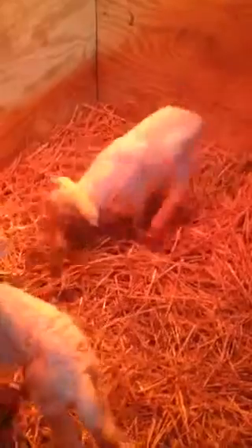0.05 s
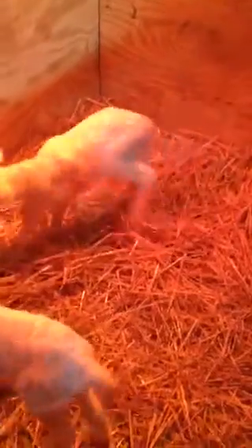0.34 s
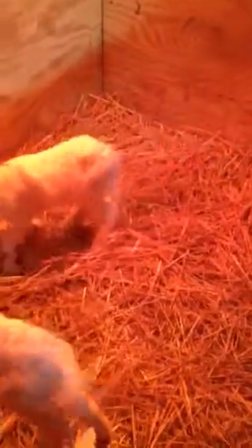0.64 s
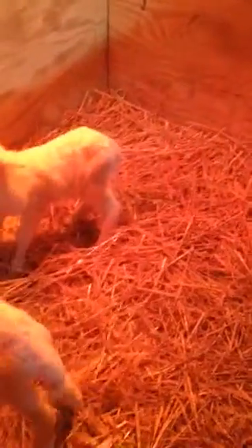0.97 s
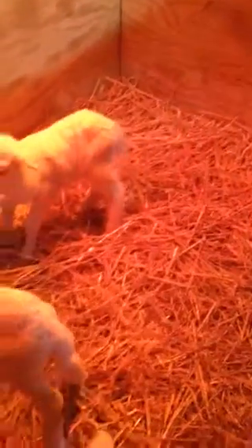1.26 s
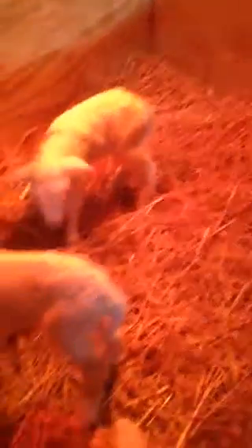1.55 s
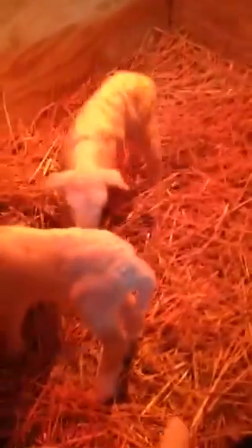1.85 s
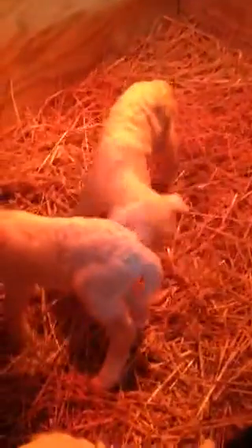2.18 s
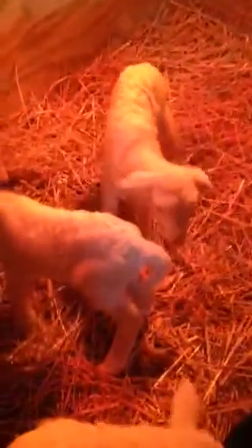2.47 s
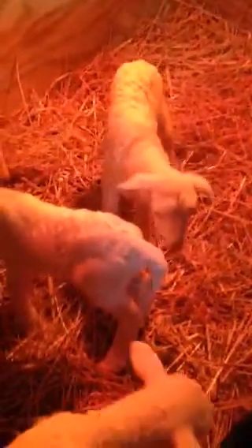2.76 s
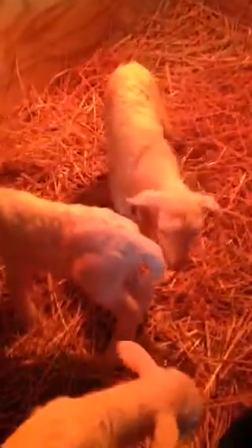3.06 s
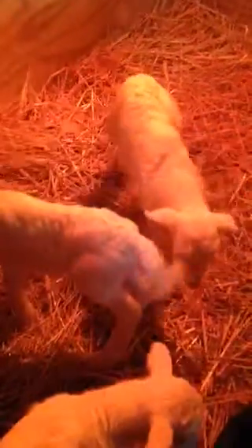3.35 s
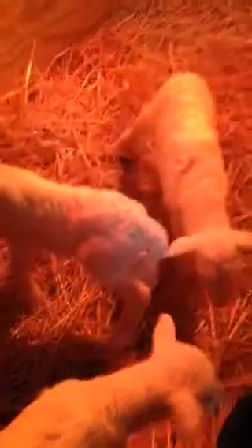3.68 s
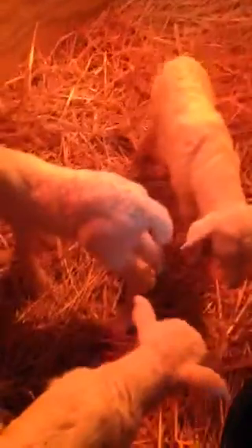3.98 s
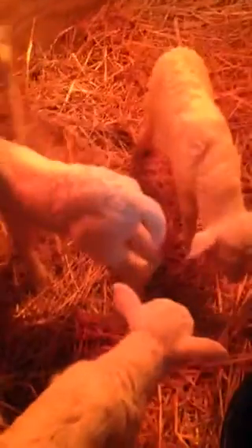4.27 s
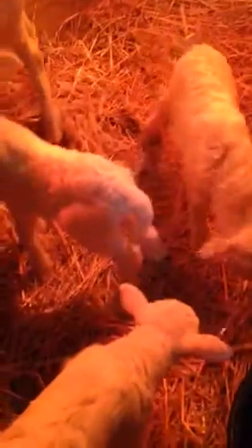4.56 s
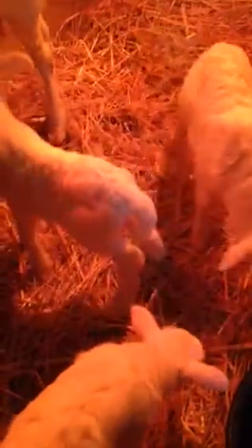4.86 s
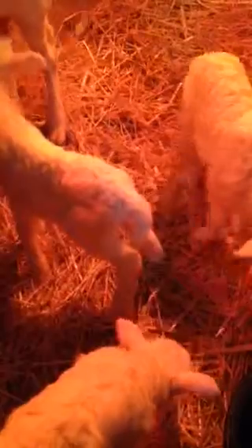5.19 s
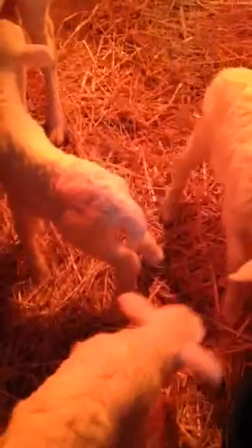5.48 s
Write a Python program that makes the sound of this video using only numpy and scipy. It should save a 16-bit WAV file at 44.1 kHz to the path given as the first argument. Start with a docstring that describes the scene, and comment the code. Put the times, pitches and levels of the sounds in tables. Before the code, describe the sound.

Newborn lambs shuffle about on dry straw in a small wooden pen. Their uneven steps make short, soft swells of fine rustling and crunching, dotted with crisp cracks and snaps of single stalks. Hooves now and then tick and thud faintly in the bedding. The movement eases briefly midway, then picks up again. A faint low barn hum lies underneath, and the small microphone sounds bright.

```python
"""Dry straw crackles as newborn lambs shuffle about in a small wooden pen.
Each step rubs and buckles many stalks: a fine rustle, a fuller crunch and rasp under weight,
single cracks and snaps. Hooves tick on thick stalks and thud softly into the bedding.
A faint hum wavers over the barn's low murmur; a small mono microphone rings near 6 kHz."""
import sys
import numpy as np
from scipy import signal
from scipy.fft import rfft, irfft, next_fast_len
from scipy.io import wavfile
from scipy.ndimage import uniform_filter1d

SR = 44100
rng = np.random.default_rng(int(sys.argv[2]) if len(sys.argv) > 2 else 0)


def wav_record(signal):
    """Record a signal, one row per channel, as 16-bit PCM in the file named by sys.argv[1]."""
    frames = np.transpose(np.atleast_2d(signal))
    bounded = np.clip(frames, -1, 1)
    # unit amplitude maps onto the largest positive 16-bit level
    quanta = np.round(bounded * 32767).astype(np.int16)
    wavfile.write(sys.argv[1], SR, quanta)


N = 252693

# hoof presses and lifts: t/s at full weight, rustle drive/dB, crunch/dB re drive, press time/s
HOOF_STEPS = [(0.003, -45.5, -12, 0.02), (0.132, -45, -16, 0.111), (0.267, -46, -16, 0.066),
              (0.401, -52.5, -13, 0.049), (0.516, -48.5, -17, 0.037), (0.617, -44.5, -17.5, 0.046),
              (0.759, -55.5, -11.5, 0.18), (0.891, -48, -17, 0.095), (1.079, -54, -15.5, 0.045),
              (1.491, -57, -20, 0.052), (1.586, -51.5, -15, 0.029), (1.751, -56.5, -15, 0.013),
              (1.815, -52.5, -24, 0.027), (1.878, -49.5, -14.5, 0.042), (2.022, -51, -14.5, 0.058),
              (2.122, -45.5, -17, 0.051), (2.391, -51.5, -14, 0.067), (2.466, -56.5, -18, 0.015),
              (2.668, -63.5, -9, 0.021), (2.838, -55.5, -13, 0.06), (3.214, -54.5, -14.5, 0.126),
              (3.516, -48.0, -15, 0.086), (3.619, -51, -10.5, 0.048), (3.845, -56.0, -10.5, 0.025),
              (3.946, -50.5, -15, 0.046), (4.016, -53, -16, 0.011), (4.085, -56, -7.5, 0.13),
              (4.322, -47, -13.5, 0.077), (4.407, -44.0, -15, 0.056), (4.693, -52.5, -10, 0.043),
              (5.238, -50, -10, 0.15), (5.506, -47, -15, 0.024), (5.578, -44, -16, 0.035),
              (5.725, -56.5, -15, 0.027)]
# bodies stir the bedding between steps: t/s, rustle drive/dB
BODY_STIR = [(0.0, -57.5), (1.0, -55), (1.21, -61), (1.305, -68), (1.42, -63), (1.66, -58.5), (2.22, -53.5),
             (2.52, -71), (2.8, -56.5), (3.02, -62), (3.42, -51.0), (3.77, -59.5), (4.15, -56), (4.8, -57),
             (5.05, -54.5), (5.73, -46.5)]
# fine rustle spectrum: f/Hz, relative level/dB
RUSTLE_SPECTRUM = [(1000, -29), (2500, -9), (4000, -4), (6300, -0.5), (9000, -0.5), (12000, -0.8),
                   (15500, -3.5)]
# spectrum of straw under weight: f/Hz, relative level/dB
CRUNCH_SPECTRUM = [(40, -30), (150, -7), (400, -2), (720, -3), (980, -0.5), (1350, -1.5), (2000, 0),
                   (3500, 1), (6000, 2.5), (12000, -25)]
# loudest bundles crushed: t/s, relative level/dB
BUNDLE_CRUSHES = [(0.1301, -28), (0.5921, -40), (0.6114, -44), (0.8304, -31.5), (0.8734, -33),
                  (0.9684, -35.5), (0.9844, -35.5), (1.7525, -35), (1.811, -44), (2.1178, -34),
                  (2.1264, -29), (2.993, -41.5), (3.0632, -39), (3.4297, -33), (3.8314, -45), (3.946, -38),
                  (4.0585, -39), (4.1045, -38.5), (4.2921, -36), (4.376, -33), (4.5952, -40)]
# hollow stalks buckle: t/s, dry peak/dB, f/Hz
STALK_CRACKS = [(0.0973, -45, 6500), (0.524, -50, 6360), (0.595, -42.5, 6000), (0.6125, -51, 6300),
                (0.755, -46, 6700), (0.969, -51, 6300), (1.207, -55, 6250), (1.265, -58, 6500),
                (1.3857, -62, 6400), (1.5644, -53, 6400), (1.6145, -48.5, 6350), (1.754, -58, 6300),
                (1.813, -48, 6200), (1.82, -49, 6000), (2.1286, -47, 6200), (2.8537, -53, 6400),
                (2.865, -52, 6300), (2.9703, -57, 6200), (3.0636, -53, 6400), (3.281, -58, 6460),
                (3.8243, -48, 6250), (3.832, -48, 5840), (3.946, -52, 6640), (4.1016, -50, 6700),
                (4.2512, -52, 6400), (4.597, -50.5, 6200), (4.6002, -54, 6170)]
# thin stalks break: t/s, dry peak/dB, high-pass f/Hz
STALK_SNAPS = [(1.2074, -45, 3000), (1.2252, -45.5, 6500), (1.3392, -50, 3000), (1.3578, -50, 9000),
               (2.1227, -34, 5950), (3.1164, -38.5, 9300), (4.1618, -36, 9000), (4.252, -39, 6000)]
# squeezed stalks, thick low and thin high: t/s, level/dB, f/Hz, swell sigma/s
STALK_RASPS = [(0.63, -69, 6200, 0.018), (2.145, -67, 1750, 0.016), (2.848, -72, 890, 0.039),
               (3.833, -65, 5950, 0.0097), (3.552, -67, 1600, 0.02), (4.31, -64, 1700, 0.022),
               (4.415, -63.5, 1800, 0.028), (4.696, -73.5, 1200, 0.021), (5.525, -64, 5740, 0.016),
               (5.59, -59.5, 5700, 0.024), (5.60, -63.5, 2010, 0.023)]
# leg dragged along stalks: t/s, level/dB
LEG_DRAG = [(0.76, -89), (0.84, -70), (0.98, -69), (1.03, -73), (1.11, -73), (1.2, -94)]
# hooves on thick stalks: t/s, dry peak/dB, f/Hz
HOOF_KNOCKS = [(0.368, -57, 1270), (3.177, -52, 1030), (4.101, -56, 1730), (4.1618, -45.5, 1510)]
# cushioned footfalls: t/s, level/dB, f/Hz, swell sigma/s
HOOF_THUDS = [(0.102, -63, 137, 0.041), (0.142, -68.5, 200, 0.04), (0.445, -69, 165, 0.061),
              (0.835, -72.5, 345, 0.044), (1.443, -68, 138, 0.018), (2.13, -69, 444, 0.016),
              (2.82, -71, 148, 0.058), (3.877, -71, 214, 0.065), (4.573, -71.5, 138, 0.056),
              (5.45, -70.5, 195, 0.031)]
# distant hum: t/s, f/Hz, level/dB
DISTANT_HUM = [(0.0, 135, -79), (0.85, 138.2, -79.5), (1.6, 141.4, -71), (2.9, 140.1, -72),
               (3.6, 139.8, -79.5), (4.4, 132.5, -78.5), (5.73, 134.6, -82.5)]
# barn murmur spectrum: f/Hz, relative level/dB
BARN_SPECTRUM = [(25, -30), (50, -20), (80, -15), (115, -6.5), (165, 1.5), (220, -1.5), (320, -8),
                 (600, -10), (1200, -15), (3000, -16.5), (15000, -22)]

PEN_T60_S = 0.24
MIC_HZ, MIC_WIDTH_HZ, MIC_BOOST_DB, CUTOFF_HZ = 6334, 1320, 12.5, 15400


def straw(drive_db, crunch_db):
    """Harder movement sets more stalks slipping, in clumps; weight adds a fuller crunch."""
    slips_per_s = 4500 * from_db(.7 * (drive_db - np.mean(drive_db)))
    clumps = from_db(1.06 * drift(rate_hz=38))
    light = scatter(slips(slips_per_s, spread_db=0.5) * clumps, wet_db=-2.5)
    heavy = scatter(slips(.6 * slips_per_s, spread_db=2.0) * clumps, wet_db=-4.0)
    rustle = from_db(drive_db - 5.0) * colour(light, RUSTLE_SPECTRUM)
    crunch = from_db(crunch_db) * colour(heavy, CRUNCH_SPECTRUM)
    return rustle + crunch


def steps(lift_per_press, squareness, stir_crunch_db):
    """Rustle drive and crunch in dB: each step swells, lets go and adds its power to the stirring."""
    t = np.arange(N) / SR
    stir_db, = curves(BODY_STIR)
    drive_power = from_db(stir_db) ** 2
    crunch_power = from_db(stir_db + stir_crunch_db) ** 2
    for at_s, db, crunch_db, press_s in HOOF_STEPS:
        span_s = np.where(t < at_s, press_s, press_s * lift_per_press)
        spans_away = np.minimum(np.abs((t - at_s) / span_s), 10)
        load = from_db(db) * np.exp(-spans_away ** squareness)  # 2 is a bell; more holds longer
        drive_power += load ** 2
        crunch_power += (load * from_db(crunch_db)) ** 2
    return 10 * np.log10(drive_power), 10 * np.log10(crunch_power)


def slips(per_s, spread_db):
    """Stalks catch and let go at random: many tiny clicks, a few large, at even mean power."""
    sizes = from_db(spread_db * np.minimum(rng.exponential(1, N), 4.5))
    signs = rng.choice([-1, 1], N)
    clicks = sizes * signs * (rng.random(N) < per_s / SR)
    local_power = np.abs(uniform_filter1d(clicks ** 2, size=1100))
    return clicks / np.sqrt(local_power + 1e-6)


def crushes(drive_db, small_per_s, grain_db, decay_s):
    """A bundle gives way, then splinters briefly; small ones go at random, scaled by the movement."""
    t, out = np.arange(SR // 10) / SR, np.zeros(N + SR)
    starts = np.flatnonzero(rng.random(N) < small_per_s / SR)
    small_db = drive_db + 2 + 5 * rng.standard_normal(N)
    small_crushes = [(i / SR, small_db[i]) for i in starts]
    for at_s, db in list(BUNDLE_CRUSHES) + small_crushes:
        noise = rng.standard_normal(len(t))
        splinters = unit_rms(noise * from_db(grain_db * rng.standard_normal(len(t))))
        out[round(at_s * SR):][:len(t)] += from_db(db - 11.5) * splinters * np.exp(-t / decay_s)
    band = signal.butter(1, [4000, 10000], "band", fs=SR, output="sos")
    return pen(signal.sosfilt(band, out[:N]), wet_db=-5.0)


def cracks(ring_s):
    """A hollow stalk buckles and rings for a few cycles."""
    t, out = np.arange(SR // 100) / SR, np.zeros(N + SR)
    envelope = t / ring_s * np.exp(1 - t / ring_s)
    for at_s, db, hz in STALK_CRACKS:
        out[round(at_s * SR):][:len(t)] += from_db(db) * envelope * np.sin(2 * np.pi * hz * t)
    return pen(out[:N], wet_db=-6)


def snaps(decay_s):
    """A thin stalk breaks with one bright click."""
    t, out = np.arange(SR // 100) / SR, np.zeros(N + SR)
    for at_s, db, low_hz in STALK_SNAPS:
        splinter = rng.standard_normal(len(t)) * np.exp(-t / decay_s)
        click = signal.sosfilt(signal.butter(2, low_hz, "high", fs=SR, output="sos"), splinter)
        out[round(at_s * SR):][:len(t)] += from_db(db) * click / np.abs(click).max()
    return pen(out[:N], wet_db=-14)


def rasps(width_hz):
    """Stalks grind together under weight, each bundle at its own pitch."""
    t, out = np.arange(N) / SR, np.zeros(N)
    grinding = scatter(slips(per_s=2500, spread_db=0.0), wet_db=-11)
    for at_s, db, hz, sigma_s in STALK_RASPS:
        swell = np.exp(-.5 * ((t - at_s) / sigma_s) ** 2)
        out += from_db(db) * swell * unit_rms(resonate_twice(grinding, hz, width_hz))
    return out


def drag(hz, width_hz):
    """Stalks sliding along a leg catch in quick succession and rasp in one band."""
    level_db, = curves(LEG_DRAG)
    catches = scatter(slips(per_s=5300, spread_db=2.0), wet_db=2.0)
    return from_db(level_db) * unit_rms(resonate_twice(catches, hz, width_hz))


def knocks(width_hz, decay_s):
    """A hoof meets a thick stalk: a short, dull tick."""
    t, out = np.arange(SR // 20) / SR, np.zeros(N + SR)
    for at_s, db, hz in HOOF_KNOCKS:
        impact = rng.standard_normal(len(t)) * np.exp(-t / decay_s)
        tick = resonate(impact, hz, width_hz)
        out[round(at_s * SR):][:len(t)] += from_db(db) * tick / np.abs(tick).max()
    return pen(out[:N], wet_db=-13)


def thuds(relative_width):
    """The bedding cushions each footfall into a low, rounded swell."""
    t, out = np.arange(N) / SR, np.zeros(N)
    for at_s, db, hz, sigma_s in HOOF_THUDS:
        swell = np.exp(-.5 * ((t - at_s) / sigma_s) ** 2)
        boom = swell * resonate_twice(rng.standard_normal(N), hz, relative_width * hz)
        out += from_db(db) * boom * np.linalg.norm(swell) / np.linalg.norm(boom)
    return out


def scatter(clicks, wet_db, spots=8):
    """Clicks come from all over the bedding, each spot with its own reflections."""
    spot = rng.integers(0, spots, N)
    return sum(pen(clicks * (spot == k), wet_db) for k in range(spots))


def pen(x, wet_db):
    """Direct sound plus dense, fast-dying reflections off the boards; power is kept."""
    t = np.arange(int(PEN_T60_S * SR)) / SR
    tail = rng.standard_normal(len(t)) * from_db(-60 * t / PEN_T60_S) * (t > .003)
    reflections = signal.fftconvolve(x, tail / np.linalg.norm(tail))[:N]
    wet = from_db(wet_db)
    return (x + wet * reflections) / np.sqrt(1 + wet ** 2)


def hum(waver_db):
    """One distant low tone, drifting in pitch and strength."""
    hz, level_db = curves(DISTANT_HUM)
    rms = from_db(level_db + waver_db * drift(rate_hz=4))
    return rms * np.sqrt(2) * np.sin(2 * np.pi * np.cumsum(hz) / SR)


def barn(level_db):
    """Steady low murmur."""
    return from_db(level_db) * colour(rng.standard_normal(N), BARN_SPECTRUM)


def from_db(db):
    """Decibels to gain."""
    return 10 ** (np.asarray(db) / 20)


def unit_rms(x):
    """Scale to unit power."""
    return x / np.sqrt(np.mean(x ** 2) + 1e-20)


def curves(rows):
    """Each column after t/s, interpolated to every sample."""
    times_s, *columns = np.transpose(rows)
    return [np.interp(np.arange(N) / SR, times_s, column) for column in columns]


def drift(rate_hz):
    """Slow random wander, rms 1."""
    hop, settle = 40, 2000
    pole = np.exp(-2 * np.pi * rate_hz * hop / SR)
    noise = rng.standard_normal(N // hop + settle + 2)
    slow = signal.lfilter([1], [1, -2 * pole, pole * pole], noise)[settle:]
    return np.interp(np.arange(N) / hop, np.arange(len(slow)), unit_rms(slow))


def colour(x, spectrum):
    """Minimum-phase filter to the given spectrum; output rms 1."""
    size = 2 * next_fast_len(N)
    hz, db = np.transpose(spectrum)
    grid_hz = np.maximum(np.arange(size // 2 + 1) * SR / size, 1)
    gain = from_db(np.interp(np.log(grid_hz), np.log(hz), db))
    cepstrum = irfft(np.log(gain))
    cepstrum[1:size // 2] *= 2  # fold to causal
    cepstrum[size // 2 + 1:] = 0
    response = np.exp(rfft(cepstrum))
    return unit_rms(irfft(rfft(x, size) * response)[:N])


def resonate(x, hz, width_hz):
    """One resonance, peak gain 1."""
    return signal.lfilter(*signal.iirpeak(hz, hz / width_hz, fs=SR), x)


def resonate_twice(x, hz, width_hz):
    """Two equal resonances in series: steeper skirts."""
    return resonate(resonate(x, hz, width_hz), hz, width_hz)


def scene():
    """Straw and hooves over the barn's background, alike in both channels."""
    background = barn(level_db=-68.5) + hum(waver_db=0.9)
    drive_db, crunch_db = steps(lift_per_press=1.356, squareness=2.1, stir_crunch_db=-13.5)
    stalks = straw(drive_db, crunch_db) + drag(hz=4770, width_hz=830) + rasps(width_hz=1200)
    breaks = snaps(decay_s=0.00089) + cracks(ring_s=0.00029)
    hooves = knocks(width_hz=1000, decay_s=.003) + thuds(relative_width=0.21)
    bundles = crushes(drive_db, small_per_s=2.0, grain_db=4.0, decay_s=0.0085)
    return np.tile(stalks + bundles + breaks + hooves + background, (2, 1))


def record(dry):
    """The microphone port rings in the treble; the top is cut."""
    ring = (from_db(MIC_BOOST_DB) - 1) * resonate(dry, MIC_HZ, MIC_WIDTH_HZ)
    lowpass = signal.ellip(12, .1, 70, CUTOFF_HZ, fs=SR, output="sos")
    return signal.sosfilt(lowpass, dry + ring)


dry = scene()
out = record(dry)
wav_record(out)
```